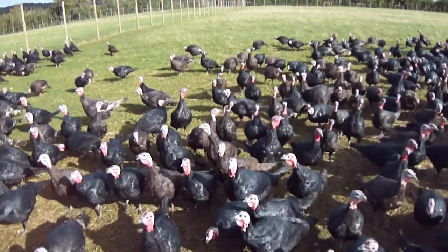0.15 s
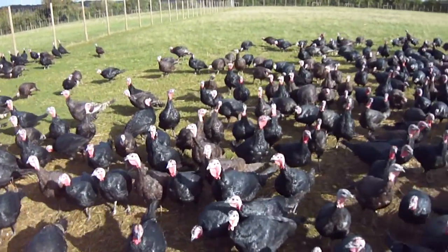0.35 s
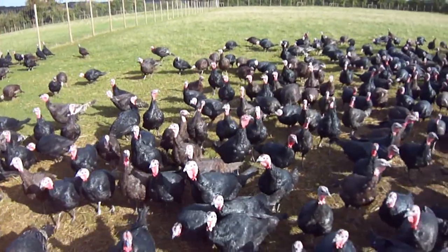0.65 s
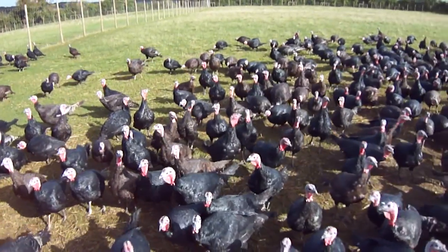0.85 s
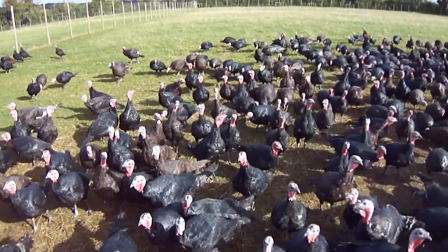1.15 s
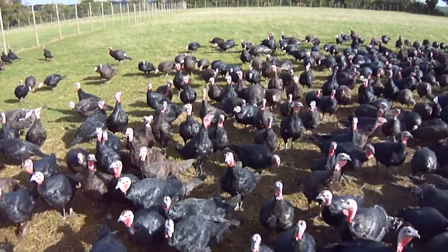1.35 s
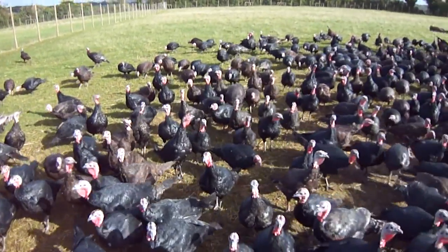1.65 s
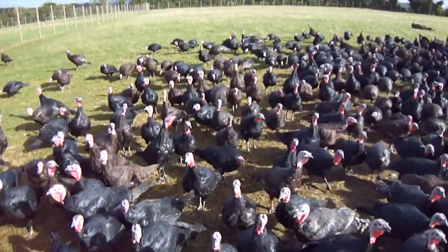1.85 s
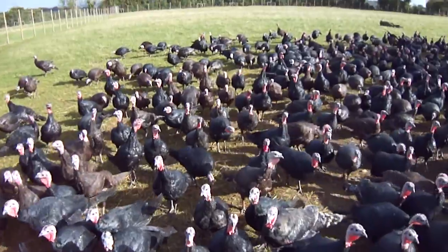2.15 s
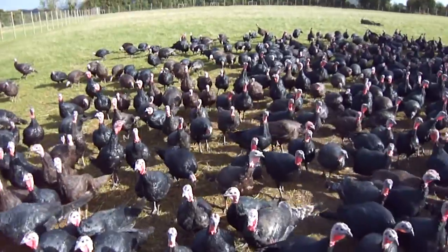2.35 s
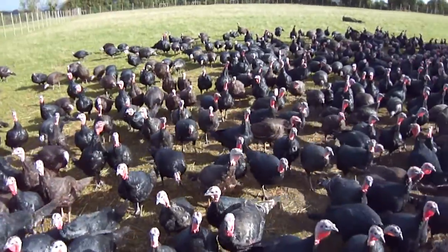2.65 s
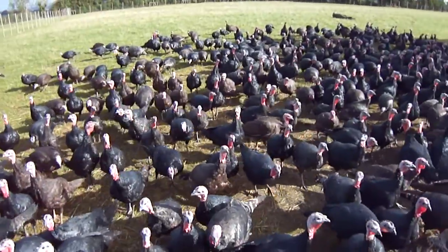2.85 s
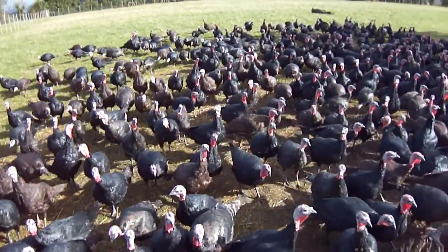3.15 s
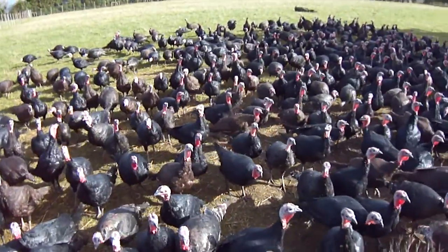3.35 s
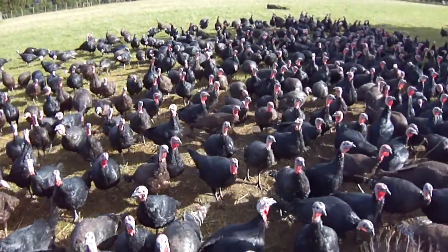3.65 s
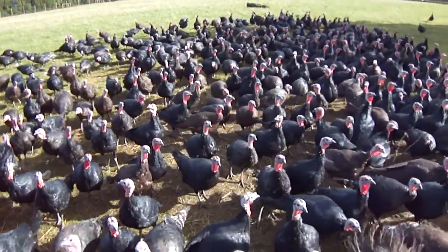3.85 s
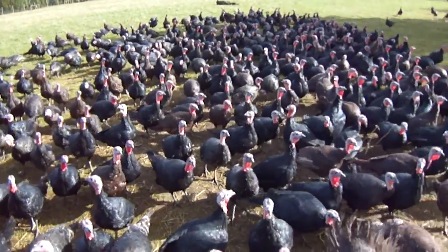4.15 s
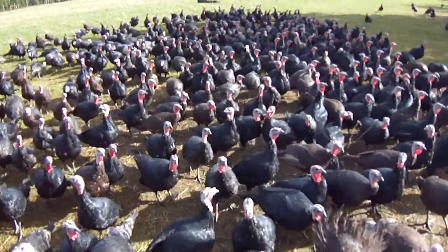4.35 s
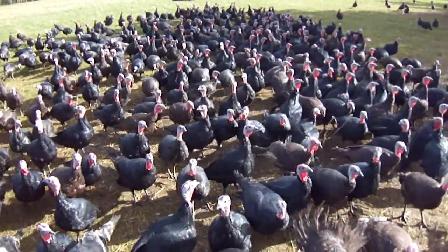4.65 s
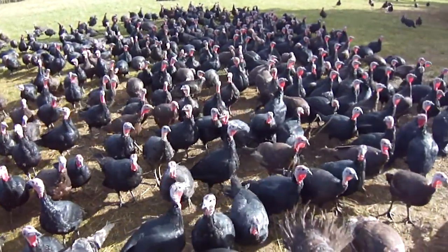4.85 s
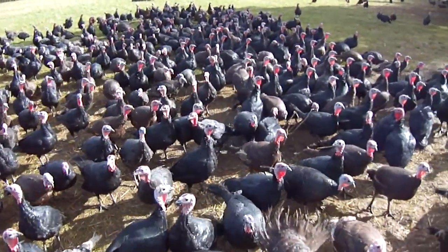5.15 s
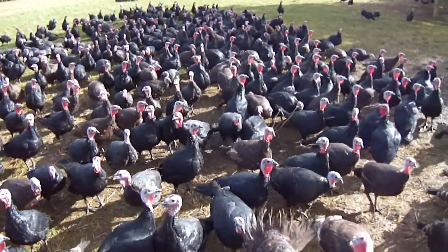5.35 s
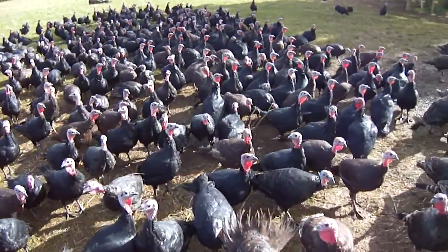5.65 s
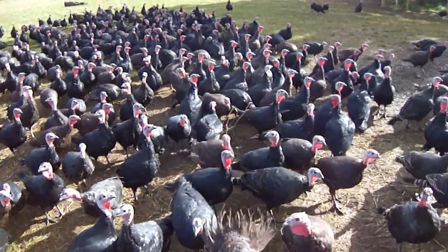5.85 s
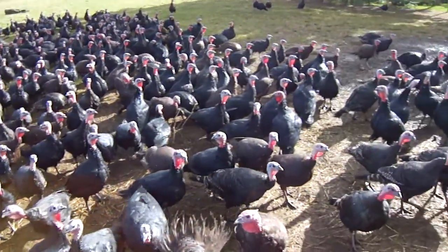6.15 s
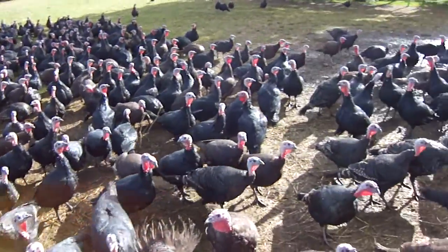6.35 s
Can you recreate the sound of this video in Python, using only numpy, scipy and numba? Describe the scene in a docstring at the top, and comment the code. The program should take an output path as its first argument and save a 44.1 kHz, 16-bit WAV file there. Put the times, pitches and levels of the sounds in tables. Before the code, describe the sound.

A large flock of turkeys calls in an open pasture, with the microphone among the birds. Short sliding notes, clucks and hoarse squawks overlap a dense babble from further away. One close hen repeats a round, falling whistle that grows louder, then a run of lower, reedy yelps follows. Wind thuds softly on the microphone, mostly at the start, over a faint rustle of feet and feathers.

```python
"""Open pasture, in the middle of a large flock of turkeys. Near birds slide, whistle, yelp, purr and
cluck over a dense babble of further birds. Each note is a gliding stack of harmonics coloured by
throat and beak; turbulent air adds the rasp. Wind thuds on the microphone over a rustle of feet and
feathers, and gain control ducks under the loud calls."""
import sys
import numpy as np
from scipy import signal
from scipy.fft import rfft, irfft
from scipy.io import wavfile
from scipy.ndimage import uniform_filter1d
from numba import njit

SR = 44100
rng = np.random.default_rng(int(sys.argv[2]) if len(sys.argv) > 2 else 0)


def output_pcm(signal):
    """Save a mono or channel-first signal as 16-bit PCM at the path in sys.argv[1].

    Samples are clipped to [-1, 1] before scaling.
    """
    pcm = np.clip(np.atleast_2d(signal).T, -1, 1) * 32767
    wavfile.write(sys.argv[1], SR, np.round(pcm).astype(np.int16))


N = 287532

# Harmonic levels (second_db, upper_db for the 3rd-4th) are relative to the fundamental.
# sliding notes: start_s, length_s, first_hz, target_hz, level_db, second_db
SLIDES = [(.065, 0.1, 1165, 1008, -22, -22), (.165, .1, 2236, 1705, -24.5, -33),
          (0, 0.065, 1204, 1000, -22, -12), (.299, 0.0334, 2010, 1666, -21, -33),
          (.25, 0.051, 1300, 1187, -21.5, -8.5), (1.42, 0.072, 1610, 1560, -24, -29),
          (.476, 0.064, 2037, 1568, -24, -41), (.52, 0.057, 1236, 1060, -21, -20),
          (.849, 0.039, 1852, 1766, -20, -16.5), (.97, 0.059, 3040, 2870, -26.5, -26),
          (.99, 0.11, 1152, 1177, -25.5, -9.5), (1.075, 0.1, 715, 798, -29.5, 4.5),
          (1.155, 0.075, 780, 1046, -23.5, -3.5), (1.449, 0.092, 1410, 1005, -17.5, -10),
          (1.835, 0.13, 1490, 1305, -21, -12), (1.862, 0.071, 1220, 1292, -30.5, -0.5),
          (2.14, 0.096, 870, 917, -41.5, 13.5), (2.225, 0.084, 1335, 1210, -23, -3.5),
          (2.565, 0.09, 1250, 1290, -20, -8), (3.39, 0.18, 993, 871, -29.5, 0.5),
          (3.647, 0.084, 829, 910, -21, -2), (4.047, 0.067, 1087, 982, -23.5, -0.5),
          (4.05, 0.099, 1380, 1237, -24.5, -11), (4.377, 0.068, 1352, 1200, -21.5, -19),
          (4.42, 0.061, 1125, 1010, -27, -20), (4.665, 0.031, 1080, 1100, -18.5, -20),
          (4.793, 0.044, 1374, 1270, -22, 3.5), (5.035, 0.06, 1113, 1165, -22, -14),
          (5.195, 0.056, 1428, 1226, -23.5, -4), (5.315, 0.082, 1270, 1270, -34.5, -2),
          (5.407, 0.09, 2470, 1715, -22.5, -16.5), (5.518, 0.037, 1910, 1590, -20.5, -20.5),
          (5.545, 0.074, 1330, 1224, -25, 1), (5.545, .14, 1200, 1043, -20, -13),
          (5.69, 0.057, 2520, 1890, -25, -18), (5.754, 0.091, 1580, 1523, -24.5, -10),
          (5.822, 0.035, 1770, 1750, -20, -36), (5.848, 0.05, 1340, 1292, -20.5, 2),
          (5.925, .1, 1160, 1015, -22.5, -2), (6., 0.044, 2240, 1760, -24, -32),
          (6.045, 0.088, 1573, 1317, -22, -2.5), (6.132, 0.03, 1500, 1600, -19.5, -30),
          (6.16, 0.046, 1318, 1300, -24, -3), (6.352, 0.035, 1403, 1356, -17.5, -3),
          (6.46, 0.025, 1760, 1940, -20.5, -20), (6.475, 0.025, 1025, 1026, -22.5, -13)]
# slides that end in an upward flick: start_s, length_s, first_hz, target_hz, level_db, second_db
HOOKS = [(.525, .14, 1422, 1290, -24, -8), (.6, 0.082, 1055, 1015, -25.5, -1.5),
         (1.765, 0.063, 1401, 1256, -18, -16), (2.12, 0.068, 1553, 1285, -27, -2),
         (2.41, 0.059, 1307, 1250, -21.5, -10.5), (3.395, 0.1, 1340, 1220, -19.5, -9),
         (4.33, 0.061, 1994, 1910, -25, -17), (4.49, 0.072, 1450, 1240, -26, 2),
         (4.76, 0.099, 1060, 964, -26, 3.5), (6.128, 0.091, 1012, 983, -25, 1)]
# the nearest hen's whistles: break_s, fall_s, arch_db, fall_db, last_hz
WHISTLES = [(0.347, 0.078, -19, -19, 998), (0.741, 0.074, -17, -17.5, 986), (1.082, 0.082, -20, -17.5, 983),
            (1.549, 0.1, -18, -12.5, 1162), (1.944, 0.089, -10, -10, 1084), (2.311, .092, -13, -11.5, 1045),
            (2.677, 0.083, -12, -11.5, 1081), (3.036, 0.081, -12, -11.5, 1070)]
# low, reedy yelps: start_s, length_s, level_db, pitch_hz, upper_db
YELPS = [(0.185, 0.071, -25.5, 718, -8), (0.573, 0.059, -30.5, 687, -22), (2.635, 0.059, -34.5, 785, 7),
         (2.942, 0.068, -32.5, 748, 6), (3.263, 0.069, -30, 781.6, 3.5), (3.576, 0.079, -26.5, 784, 0.5),
         (3.912, 0.07, -31.5, 754.5, 3), (4.245, 0.065, -28.5, 764.6, 1.5), (4.62, 0.064, -28.5, 754, 2)]
# the droop through a yelp: pitch_ratio
YELP_GLIDE = [1.01, 1.0, .96, .915]
# two purrs of three putts: start_s, level_db, pitch_hz, between_harmonics_db
PUTTS = [(1.281, -28, 722, 9), (1.333, -23.5, 768, 3.5), (1.387, -22, 773, 3.5), (3.757, -25.5, 796, 6),
         (3.817, -22, 814, -6), (3.872, -22.5, 810, -21)]
# sharp clucks: start_s, level_db, first_hz
CLUCKS = [(1.82, -15, 1520), (2.472, -25, 1570), (3.206, -22.5, 1444), (4.372, -17, 1860),
          (4.55, -16.5, 1705), (5.238, -19.5, 1586)]
# one close squeak: start_s, length_s, first_hz, last_hz, level_db
SQUEAK = (.202, .042, 1235, 1345, -24)
# hoarse, unpitched squawks: middle_s, half_length_s, level_db
SQUAWKS = [(0.246, 0.013, -19.5), (0.873, 0.02, -23), (6.381, 0.012, -23), (2.606, 0.028, -21.5),
           (2.898, 0.027, -25), (3.19, 0.015, -24.5), (3.413, 0.021, -24), (5.437, 0.031, -23),
           (6.422, 0.024, -19)]
# throat and beak colour: frequency_hz, gain_db
THROAT = [(700, -19.5), (1600, -5), (3100, -23.5), (3900, -28), (4800, -28.5), (5600, -37), (8000, -41.5),
          (11000, -51.5)]
# swell of the further birds: time_s, level_db
BABBLE_SWELL = [(0.0, -29), (1.38, -21.5), (1.91, -33), (2.42, -23), (3.9, -23), (5.1, -21.5),
                (6.52, -23.5)]
# puffs of wind on the microphone: start_s, strength_db
THUDS = [(0.064, -38), (0.226, -47), (0.419, -37.5), (0.506, -36), (0.628, -30), (0.738, -31.5),
         (1.217, -44), (3.351, -38), (3.48, -42.5), (4.008, -46)]
# wind strength: time_s, level_db
WIND = [(0.0, -56.5), (2.45, -66), (6.52, -61)]
# colour of wind, feet and feathers: frequency_hz, gain_db
RUSTLE_COLOUR = [(20, -39), (60, -11), (130, -12), (500, -7), (1300, 11), (3000, -6), (6000, -18),
                 (11000, -27)]


def slides(table, flick=1):
    """Near birds glide between two pitches; flick is a pitch ratio reached over the last fifth."""
    start_s, length_s, first_hz, target_hz, db, second_db = np.transpose(table)
    interval = target_hz / first_hz
    path_hz = first_hz[:, None] * interval[:, None] ** (np.linspace(0, 1, 6) ** .8)  # quicker at first
    path_hz[:, -1] *= flick
    # reedy notes are strong in both the 2nd and upper harmonics; wide slides are duller
    upper_db = -12 + .99 * second_db - 55 * np.log2(interval) ** 2
    return voices(start_s, length_s, path_hz, db, second_db, upper_db,
                  waver=.0085, flutter_db=2, lift_db=-1.34)


def whistles(arch_s=.038, break_hz=1404):
    """The nearest hen repeats a round whistle: a short arch, a break, a long fall."""
    break_s, fall_s, arch_db, fall_db, last_hz = np.transpose(WHISTLES)
    arch_hz = np.tile([1530., 1610, 1645, 1561, 1435], (len(break_s), 1))
    arch = voices(break_s - arch_s + .003, arch_s, arch_hz, arch_db, -28.5, -41.5,
                  waver=.0065, attack_s=.0078)
    fall_hz = last_hz[:, None] + np.outer(break_hz - last_hz, (1 - np.linspace(0, 1, 6)) ** 1.6)
    fall = voices(break_s - .003, fall_s, fall_hz, fall_db, -27.5, -31,
                  waver=.006, attack_s=.0054, lift_db=-4)
    return arch + fall


def squeak():
    """One close, rising squeak with strong top harmonics."""
    start_s, length_s, first_hz, last_hz, db = SQUEAK
    path_hz = np.array([[first_hz, (first_hz + last_hz) / 2, last_hz, last_hz]])
    return voices([start_s], length_s, path_hz, db, 2.1, -17.5, waver=.0067, flutter_db=4, lift_db=3.6)


def yelps():
    """Each yelp opens on a short higher note, then breaks down into a reedy, drooping body."""
    start_s, length_s, db, hz, upper_db = np.transpose(YELPS)
    body = voices(start_s + .0045, length_s, np.outer(hz, YELP_GLIDE), db, 2.9, upper_db,
                  waver=.0028, flutter_db=2, attack_s=.0068, lift_db=-.16)
    opening = voices(start_s - .016, .021, np.outer(hz, [1.66, 1.63]), db + upper_db, -2, -11,
                     waver=.012, flutter_db=3, attack_s=.008)
    return body + opening


def purrs():
    """Quick upturned putts; strong-weak cycles add a tone between the first two harmonics."""
    start_s, db, hz, between_db = np.transpose(PUTTS)
    path_hz = np.outer(hz, [.92, 1, 1.03, 1.52])
    putts = voices(start_s, .029, path_hz, db, 2.6, -18.5)
    return putts + voices(start_s, .0273, 1.6 * path_hz, db + between_db, -20, -48)


def clucks():
    """Sharp, nearly pure blips that shoot up a fourth."""
    start_s, db, hz = np.transpose(CLUCKS)
    return voices(start_s, .02, np.outer(hz, [1, 1.33]), db, -28, -42, waver=.012, flutter_db=1.5)


def voices(start_s, length_s, path_hz, db, second_db, upper_db,
           waver=.0017, flutter_db=-.5, attack_s=.0071, lift_db=0, harmonics=14):
    """Trembling calls shaped by the throat; lift_db is added per harmonic above the third."""
    columns = np.broadcast_arrays(start_s, length_s, db, second_db, upper_db)
    start_s, length_s, db, second_db, upper_db = (np.array(column, float) for column in columns)
    pitch_hz = path_hz.mean(axis=1)[:, None]
    hz = pitch_hz * np.arange(1, harmonics + 1)
    throat_db = np.minimum(colour(THROAT, hz) - colour(THROAT, 3.5 * pitch_hz), 1.5)
    harmonic_db = upper_db[:, None] + throat_db + .78 * rng.standard_normal(hz.shape)
    harmonic_db += lift_db * np.maximum(np.arange(harmonics) - 2, 0)
    harmonic_db[:, 0], harmonic_db[:, 1] = 0, second_db
    gains = np.sqrt(2) * undb(harmonic_db + db[:, None]) * (hz < .4 * SR)
    return syrinx(start_s, length_s, np.ascontiguousarray(path_hz), gains,
                  1 + waver * walk(150), undb(flutter_db * walk(120)), attack_s, release_s=.0046)


@njit
def syrinx(start_s, length_s, path_hz, gains, waver, flutter, attack_s, release_s):
    """The bird's voice box: a harmonic stack glides through pitches evenly spaced in time."""
    out = np.zeros(N)
    for call in range(len(start_s)):
        first, n, phase = int(start_s[call] * SR), int(length_s[call] * SR), 1. * call
        path = path_hz[call]
        for i in range(max(0, -first), min(n, N - first)):
            along = (len(path) - 1) * i / n
            k = int(along)
            own = (first + i + 7919 * call) % N  # each call trembles in its own way
            hz = (path[k] + (along - k) * (path[k + 1] - path[k])) * waver[own]
            phase += 2 * np.pi * hz / SR
            twice_cos, below, harmonic, stack = 2 * np.cos(phase), 0., np.sin(phase), 0.
            # the beak closes through the call, so high harmonics fade first
            closing, beak_gain = 1 - .2 * i / n, 1.
            for gain in gains[call]:
                stack += gain * harmonic * beak_gain
                beak_gain *= closing
                below, harmonic = harmonic, twice_cos * harmonic - below  # next sine up
            edge = min(1., i / (attack_s * SR), (n - i) / (release_s * SR))
            out[first + i] += stack * np.sin(edge * np.pi / 2) ** 2 * flutter[own]
    return out


def rasp():
    """Squawks, and the crack that opens each reedy yelp: turbulent air crackling through the throat."""
    t, puffs = np.arange(N) / SR, np.zeros(N)
    cracks = [(start_s + .0047, .01, db + upper_db + 3) for start_s, _, db, _, upper_db in YELPS]
    for middle_s, half_s, db in cracks + SQUAWKS:
        span = slice(max(int((middle_s - 3 * half_s) * SR), 0), int((middle_s + 3 * half_s) * SR))
        puffs[span] += undb(db) * np.exp(-((t[span] - middle_s) / half_s) ** 2)
    throat = undb(.88 * colour(THROAT, np.fft.rfftfreq(N, 1 / SR)))
    air = irfft(rfft(rng.standard_normal(N)) * throat, N)
    air = signal.sosfilt(signal.butter(4, 900, "high", fs=SR, output="sos"), air)
    return level(air * undb(2 * walk(400)), 0) * puffs


def babble(calls=850):
    """Further birds at random: short calls tend to rise, long ones to fall, all dulled by distance."""
    when, size, distance, brightness = rng.random((calls, 4)).T
    pitch_spread, fall_spread, *wobble = rng.standard_normal((calls, 6)).T
    middle_hz = np.clip(1450 * np.exp(.25 * pitch_spread), 860, 2700)
    fall = .0898 * size - .035 + .02585 * fall_spread
    path_hz = np.transpose([middle_hz * np.exp(-fall * (k - 1.5) + .0141 * wobble[k]) for k in range(4)])
    start_s, length_s = when * (N / SR + .1) - .1, .0231 + .085 * size ** 2
    db, second_db = -4.2 * np.log(distance + .19), -16 + 14 * brightness
    crowd = voices(start_s, length_s, path_hz, db, second_db, .7 * second_db - 13,
                   waver=.012, flutter_db=3.5, attack_s=.0076)
    crowd = signal.sosfilt(signal.butter(3, 3200, fs=SR, output="sos"), crowd)
    return level(crowd, 0) * undb(fader_db(BABBLE_SWELL))


def body_scatter(birds, decay_s=.17, wet_db=-13):
    """Open air: only a faint scatter of the calls among the bodies."""
    t = np.arange(SR // 5) / SR
    response = rng.standard_normal(len(t)) * np.exp(-np.log(1000) * t / decay_s)
    response *= undb(wet_db) / np.sqrt(np.sum(response ** 2))
    response[0] = 1  # direct sound
    return signal.fftconvolve(birds, response)[:N]


def wind_thuds():
    """Each puff on the microphone is a cluster of one-cycle pressure bumps, the first the strongest."""
    out, t = np.zeros(N + SR), np.arange(-600, 600) / SR
    for start_s, db in THUDS:
        for k, (late, size, speed) in enumerate(rng.random((9, 3))):
            cycles = 110 * (1 + 1.87 * speed) * t
            bump = np.sin(2 * np.pi * cycles) * np.exp(-(1.66 * cycles) ** 2)
            gain = 1.95 * undb(db - .5 - 1.5 * k) * (2 * size - 1 if k else 1)
            at = int((start_s + .014 * k * (.5 + late)) * SR)
            out[at:at + len(t)] += gain * bump
    return out[:N]


def rustle():
    """Wind, feet and feathers: a bed of hiss whose lows come in gusts and whose highs flicker."""
    hz = np.fft.rfftfreq(N, 1 / SR)
    hiss = rfft(rng.standard_normal(N)) * undb(colour(RUSTLE_COLOUR, hz))
    lows = 1 / (1 + (hz / 300) ** 4)
    gusts = level(irfft(hiss * lows, N), 0) * undb(fader_db(WIND) + 4.3 * walk(9))
    flicker = irfft(hiss * (1 - lows), N) * undb(.83 * walk(7.4))
    return gusts + level(flicker, -35)


def undb(db):
    """dB to gain."""
    return 10 ** (np.asarray(db) / 20)


def level(x, db):
    """Scale to an rms level."""
    return x * undb(db) / np.sqrt(np.mean(x ** 2))


def fader_db(table):
    """A level ride through the table's points."""
    return np.interp(np.arange(N) / SR, *np.transpose(table))


def colour(table, hz):
    """Read an EQ curve in dB on a log-frequency axis."""
    points_hz, db = np.transpose(table)
    return np.interp(np.log(np.maximum(hz, 1)), np.log(points_hz), db)


def walk(rate_hz):
    """Smooth random modulation: held steps, slewed twice, with a spread of 1."""
    hold = max(int(SR / rate_hz), 1)
    steps = np.repeat(rng.standard_normal(N // hold + 1), hold)
    smooth = uniform_filter1d(uniform_filter1d(steps, hold), hold)[:N]
    return smooth / smooth.std()


@njit
def follow(x, attack_s, release_s):
    """Envelope follower with separate rise and fall times."""
    out, envelope = np.empty(len(x)), 0.
    for i, size in enumerate(np.abs(x)):
        envelope += (size - envelope) / (SR * (attack_s if size > envelope else release_s))
        out[i] = envelope
    return out


def scene():
    """Near birds in front, the flock behind, wind and rustle underneath, in mono."""
    near = slides(SLIDES) + slides(HOOKS, flick=1.2) + whistles() + squeak() + yelps() + purrs() + clucks()
    return (body_scatter(near + rasp() + babble()) + wind_thuds() + rustle())[None]


def record(dry):
    """Gain control ducks under loud calls; the top is cut steeply."""
    threshold, ratio, top_hz = undb(-17), 1.7, 11010
    envelope = follow(dry[0], attack_s=.05, release_s=.06)
    ducked = dry * (threshold / np.maximum(envelope, threshold)) ** (1 - 1 / ratio)
    return signal.sosfilt(signal.ellip(16, .2, 60, top_hz, fs=SR, output="sos"), ducked)


dry = scene()
out = record(dry)
output_pcm(out)
```